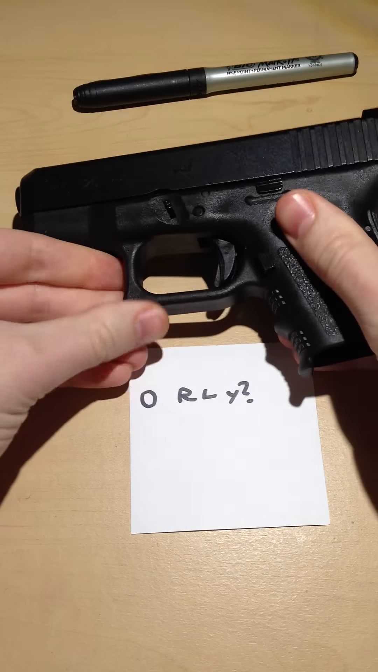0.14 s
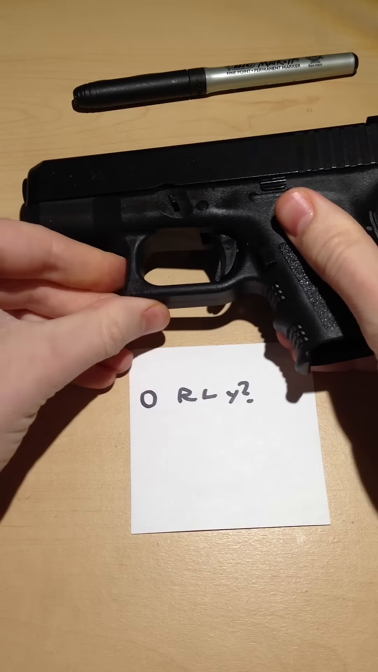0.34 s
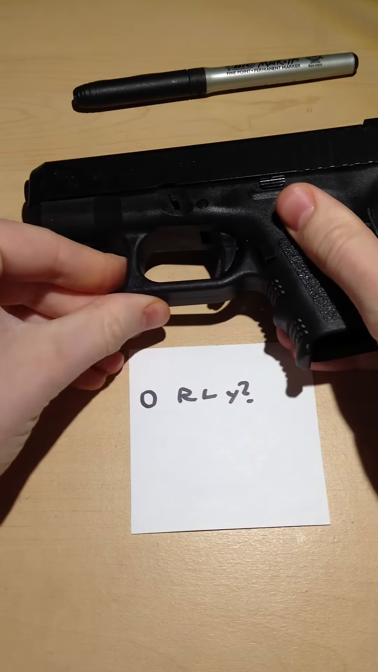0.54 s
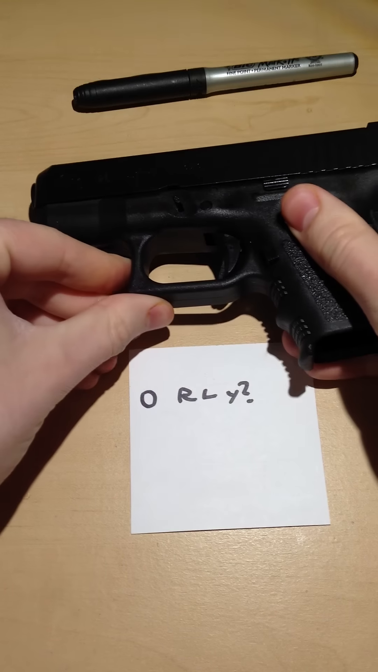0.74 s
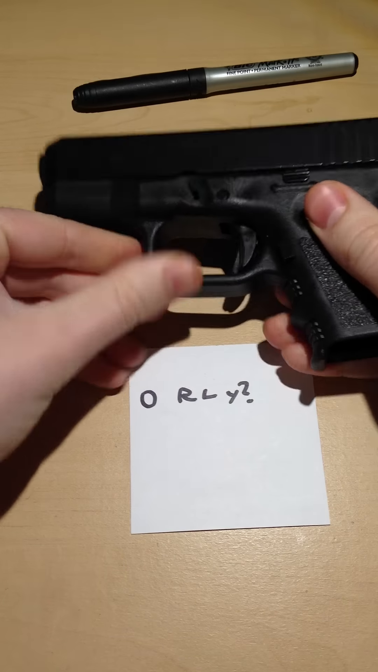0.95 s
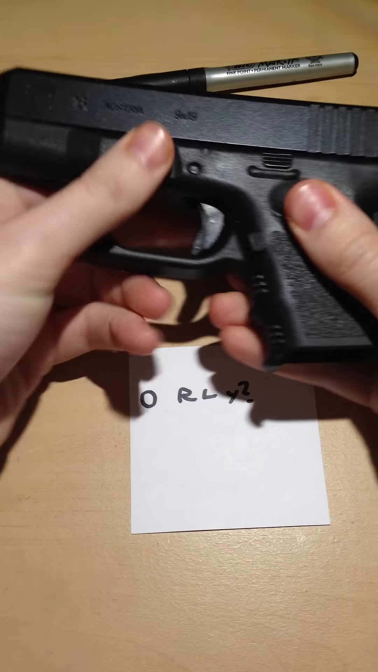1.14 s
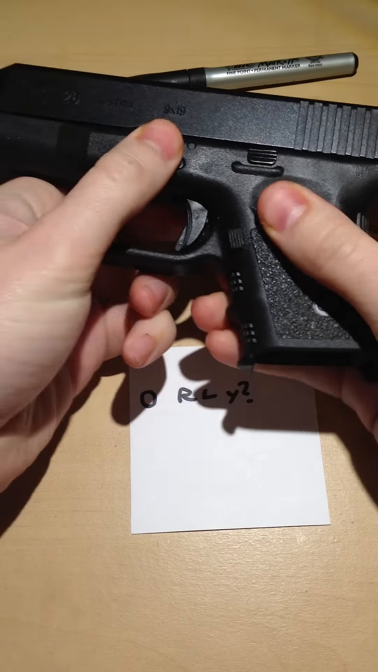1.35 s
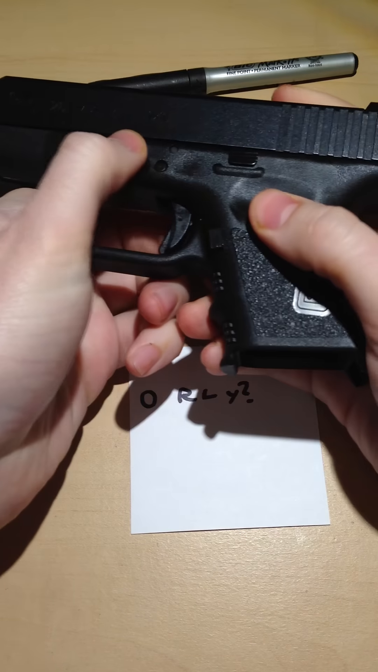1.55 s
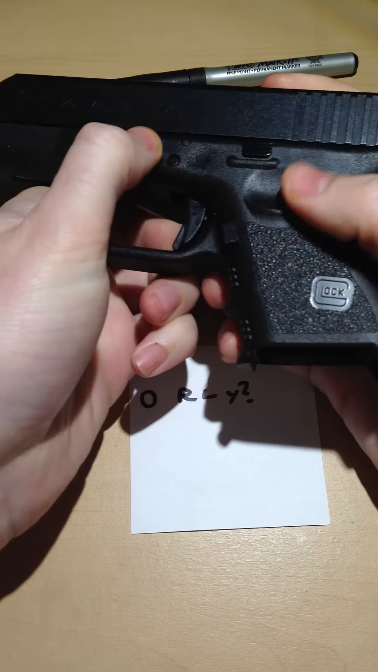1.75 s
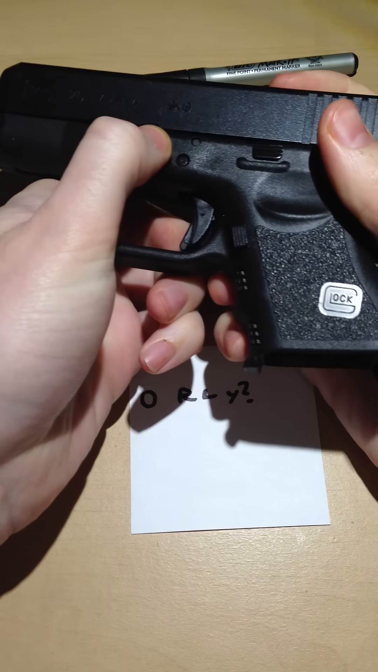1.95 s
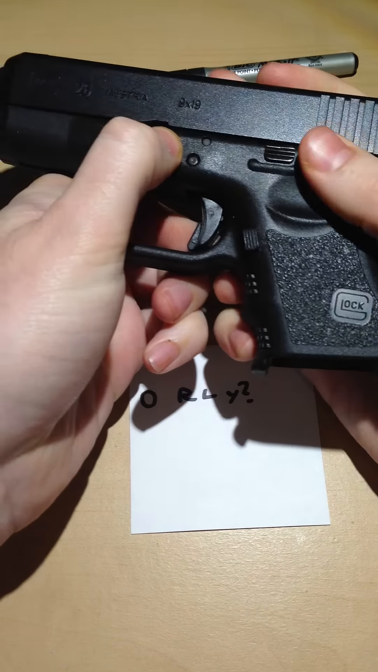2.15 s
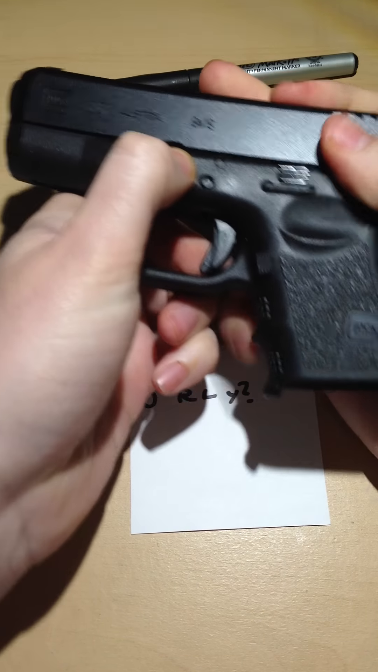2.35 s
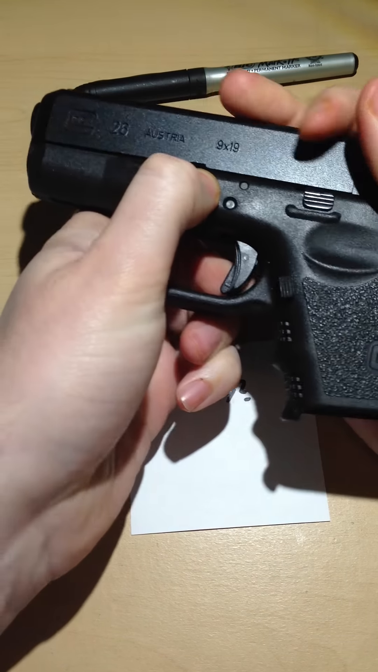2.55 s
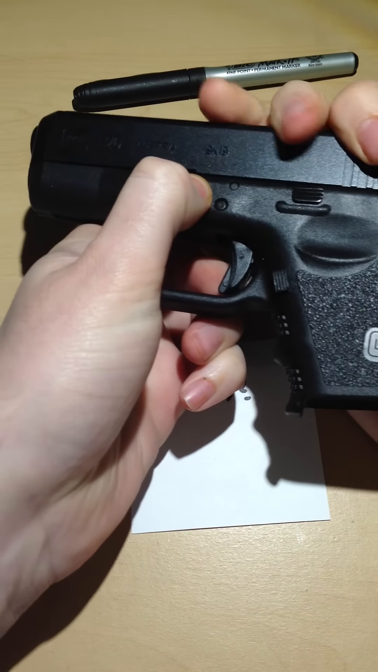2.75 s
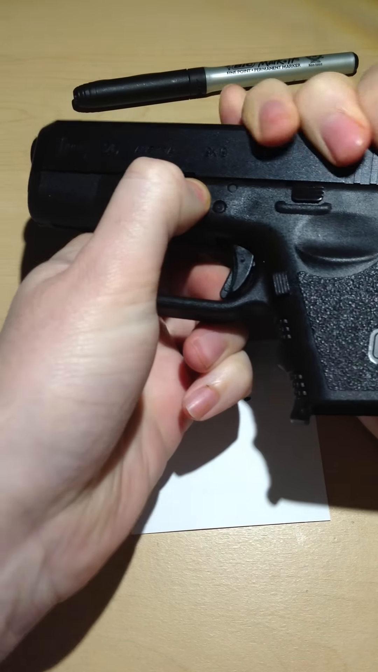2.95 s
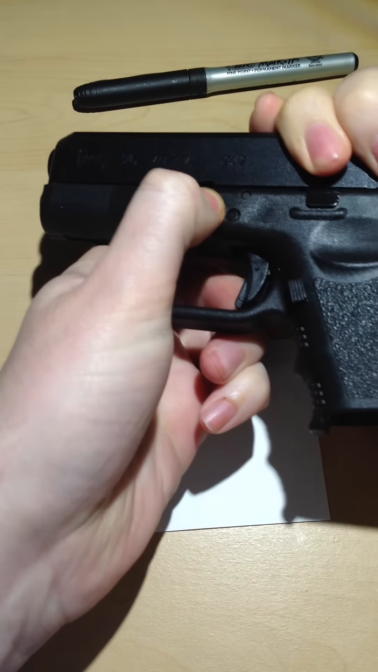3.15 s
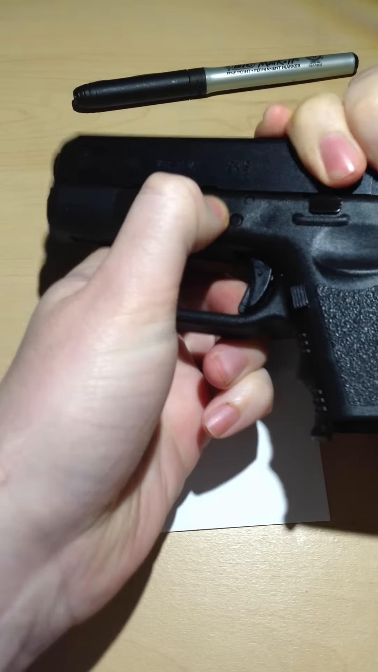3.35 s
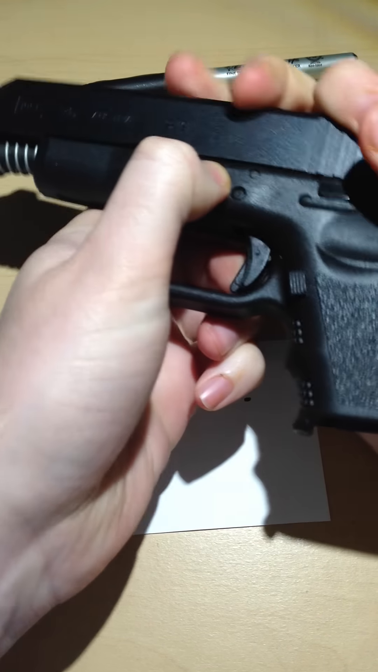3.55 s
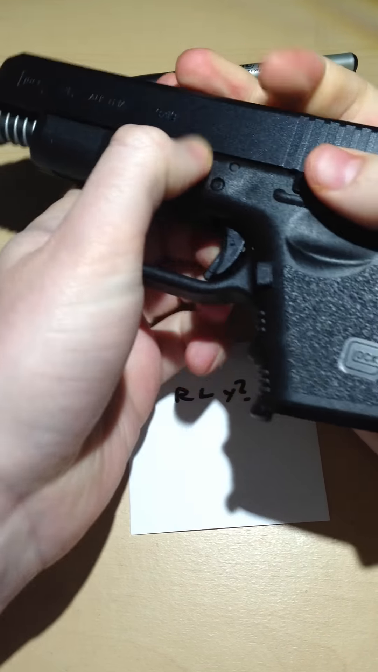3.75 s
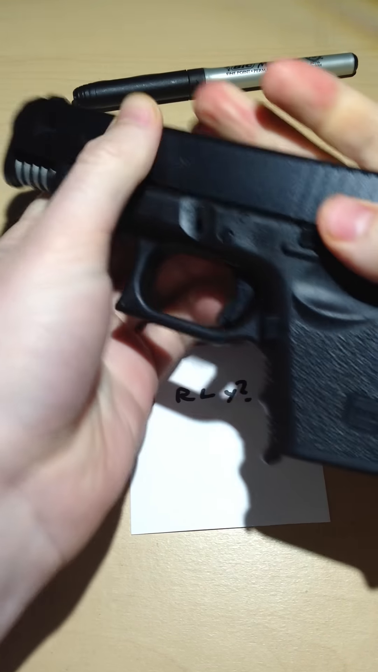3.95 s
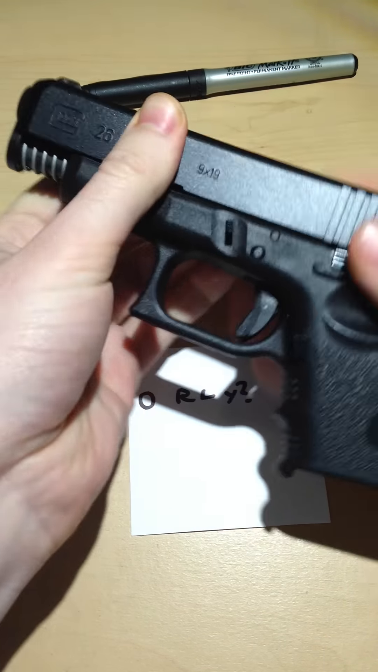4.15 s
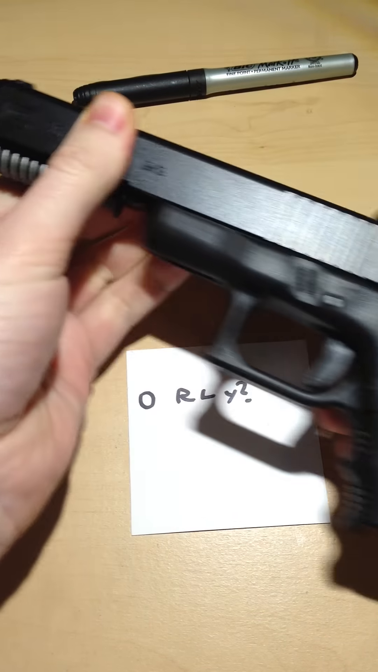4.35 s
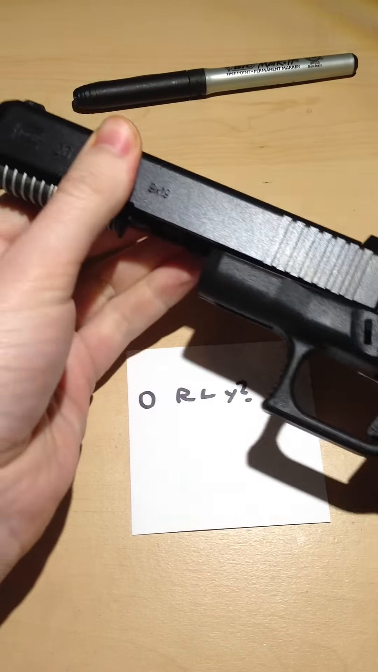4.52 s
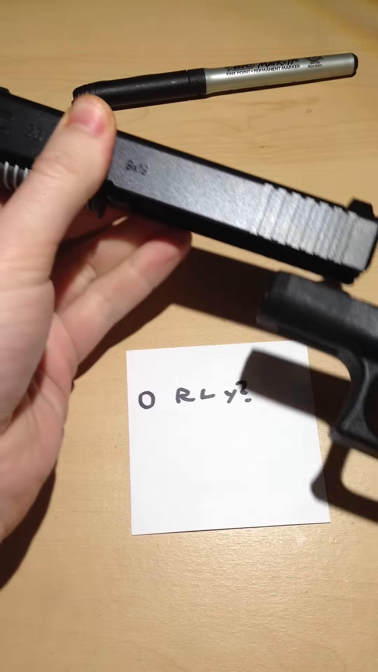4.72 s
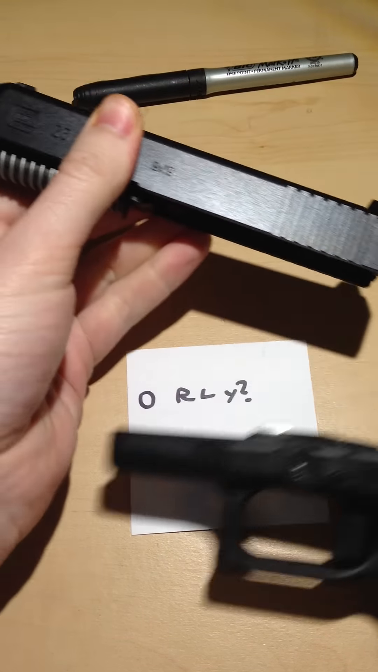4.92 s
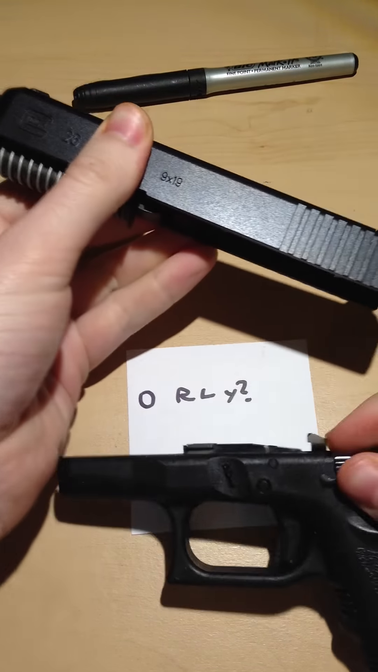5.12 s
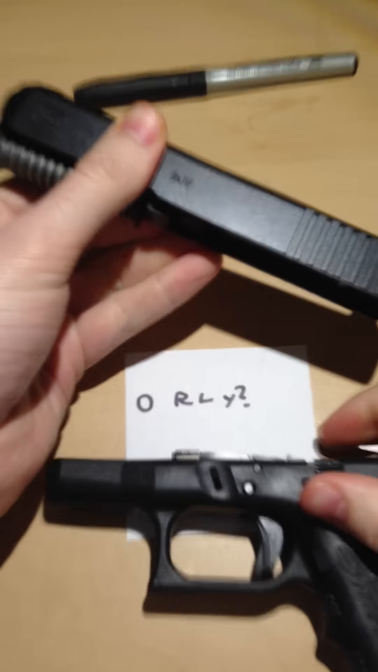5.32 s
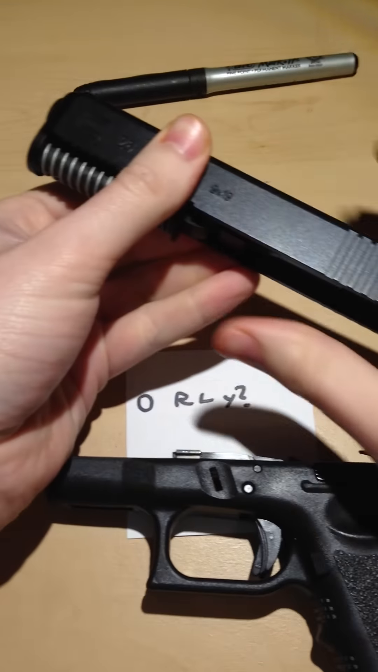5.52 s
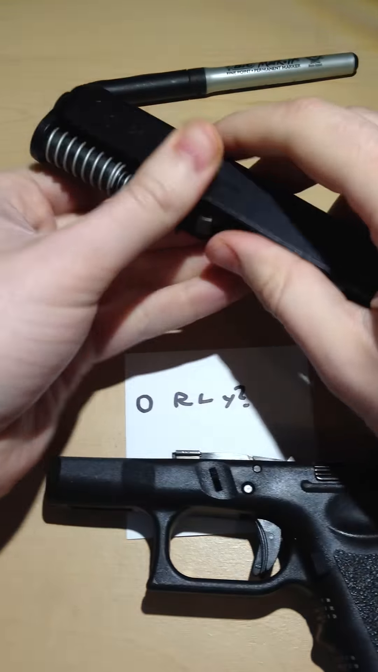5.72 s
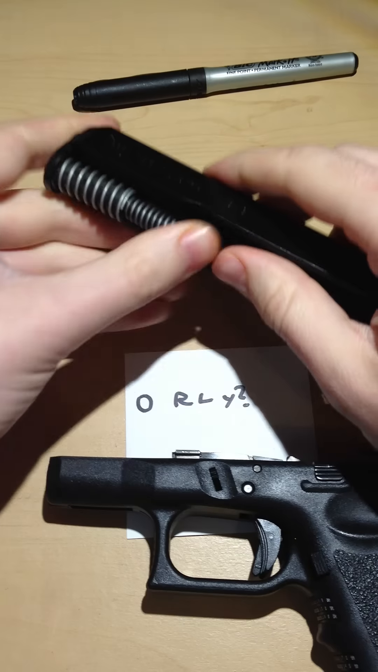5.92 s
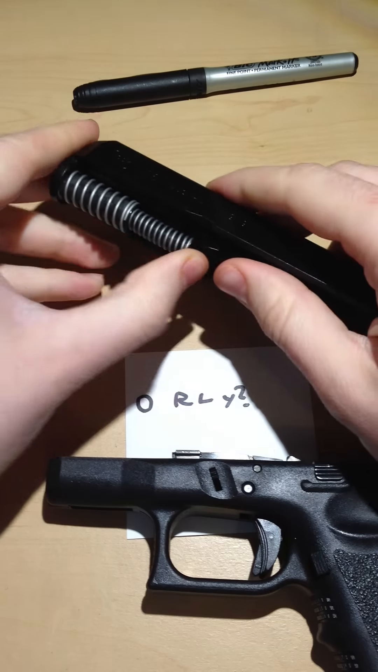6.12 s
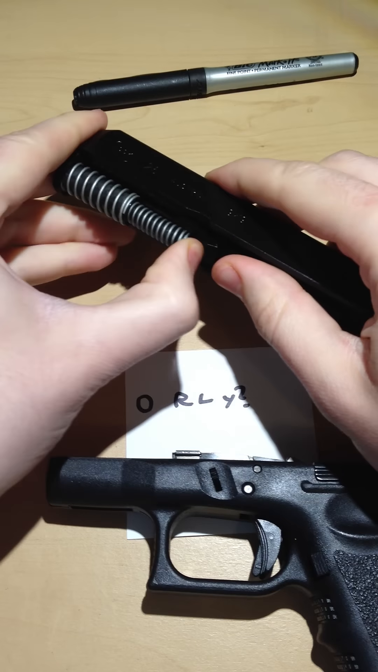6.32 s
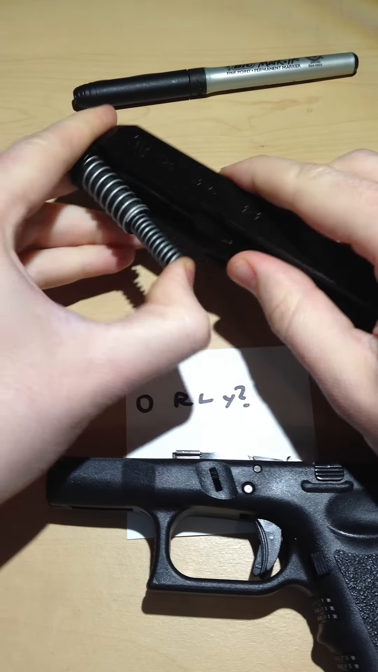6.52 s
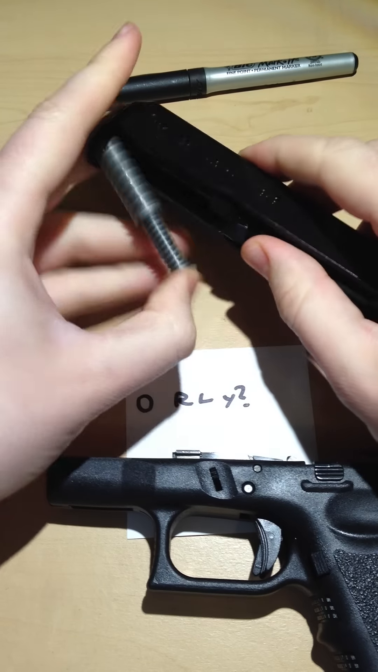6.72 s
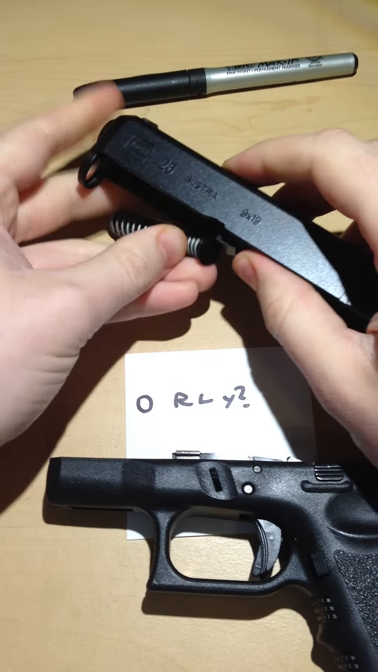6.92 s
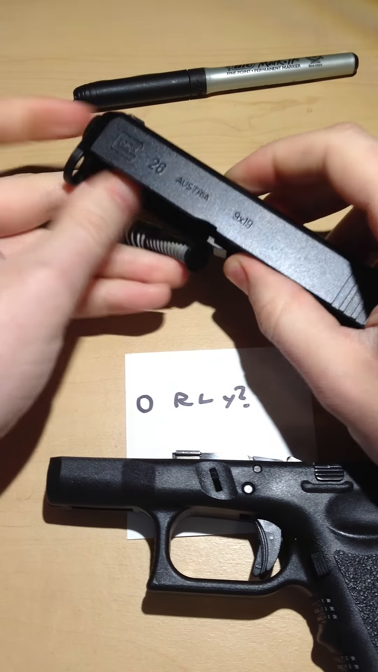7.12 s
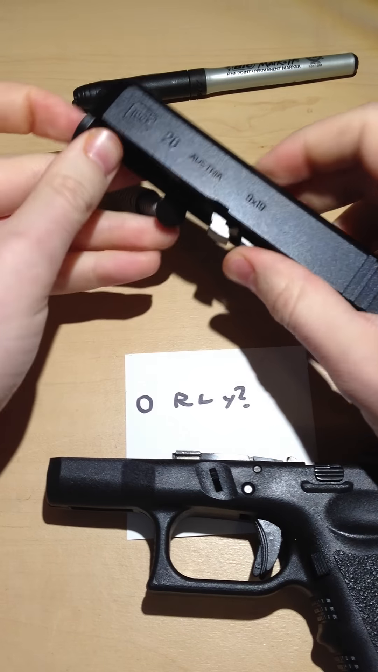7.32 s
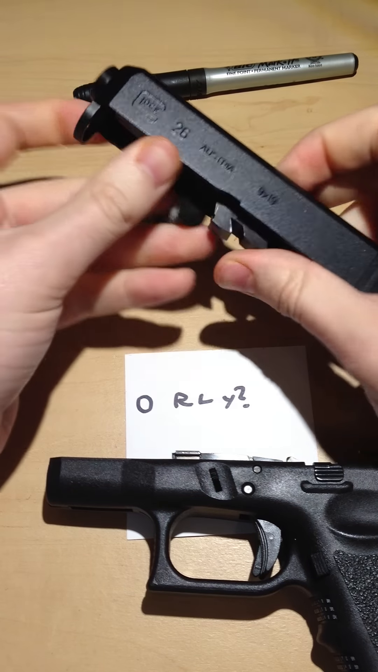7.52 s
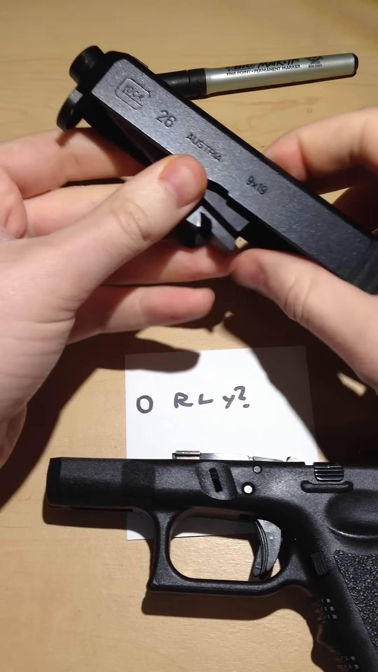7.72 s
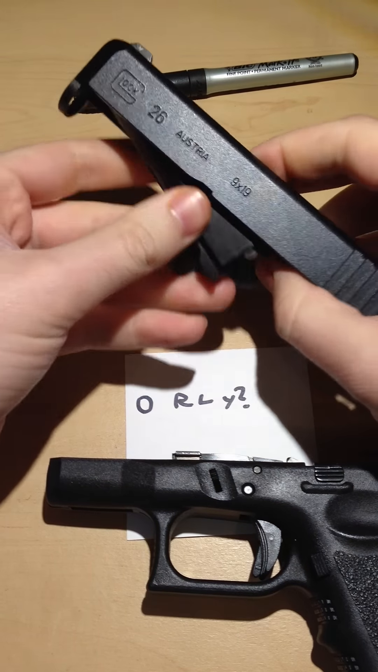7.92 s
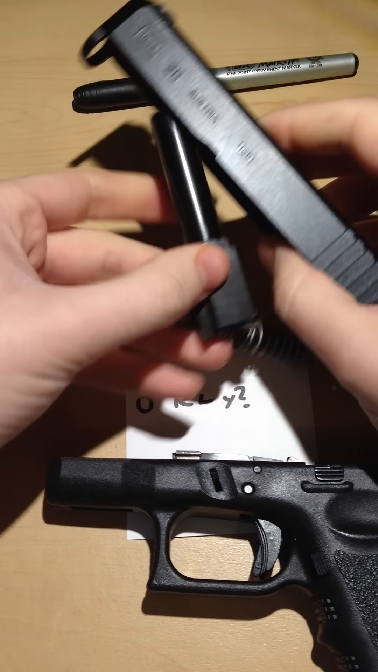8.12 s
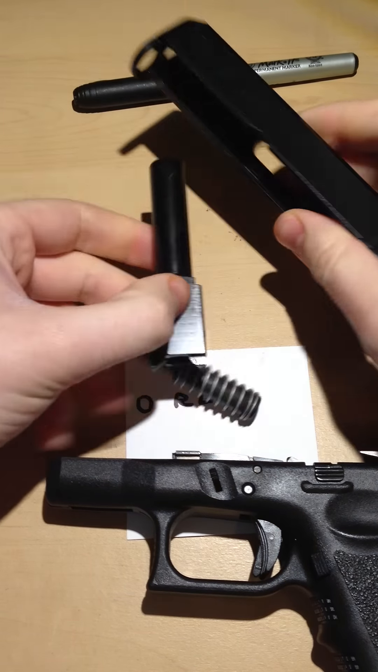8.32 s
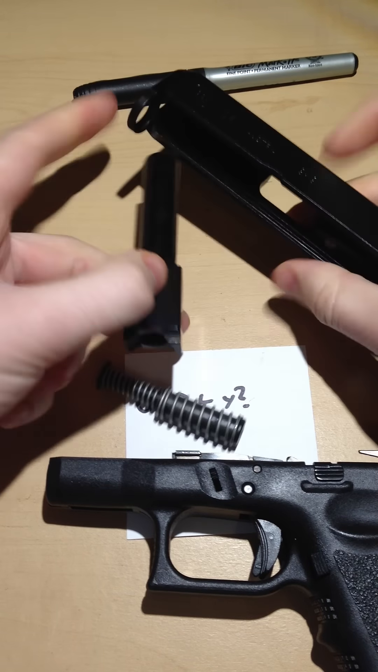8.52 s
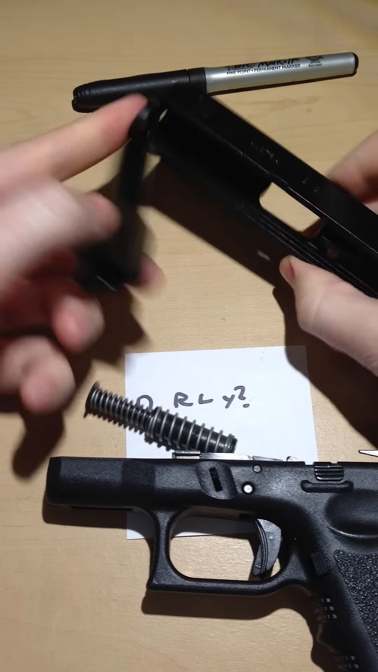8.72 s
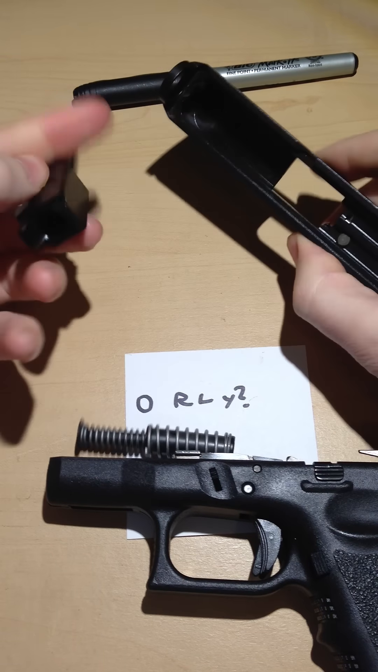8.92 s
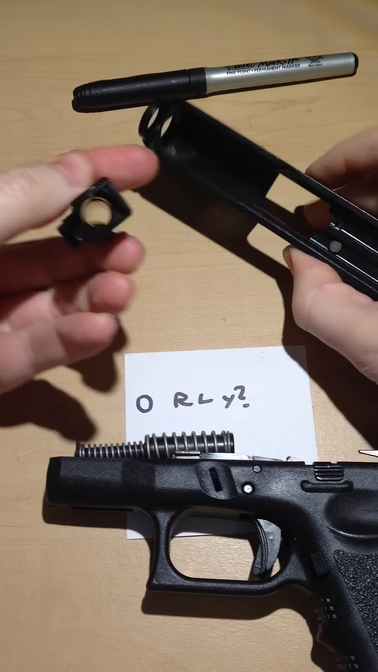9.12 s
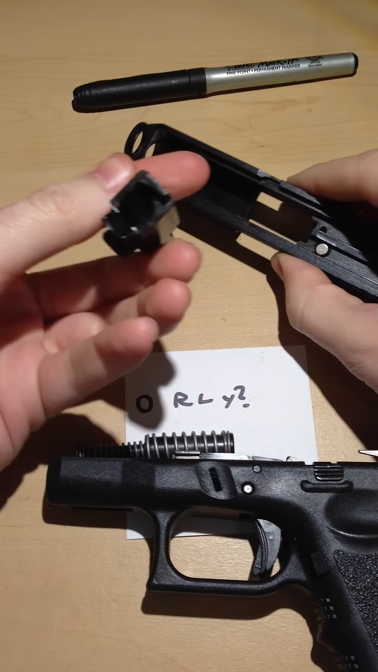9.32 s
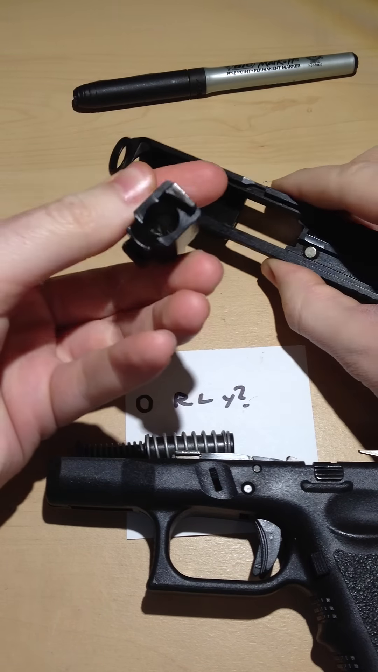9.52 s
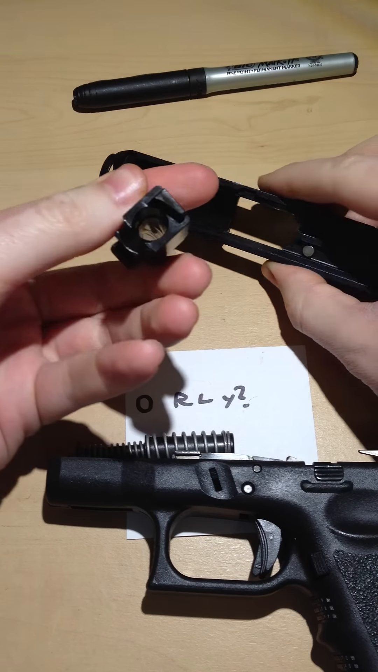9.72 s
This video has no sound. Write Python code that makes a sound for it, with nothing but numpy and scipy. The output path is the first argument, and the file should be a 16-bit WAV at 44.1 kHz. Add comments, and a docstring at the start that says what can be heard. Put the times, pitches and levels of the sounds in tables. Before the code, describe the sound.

A close microphone over a wooden desk in a small room, with soft steady air noise and faint fan tones throughout. At about 0.7 s a dull snap of the trigger with a light desk knock, then barely audible finger rubs and tiny clicks until 2.4 s, when there is a firmer click. A sharp click at 3.1 leads to a rapid cluster of bright clacks at 3.4-3.6 as the slide jumps. Scrapes and small clicks at 4.3-4.7 as it slides off its rails. At 5.2-5.4 the frame lands: the loudest, multiple clacks with woody boom. Quiet, then at 6.95 the spring pops out with a snap and chatter. From 7.3 to 8.3 thin steel clinks, gritty drags and soft rumbling handling. At 8.44 the spring drops, rattling; barrel clinks ring at 8.6-8.8, small spring ticks at 9.1, faint desk thuds near 9.5-9.7.

```python
"""A polymer-framed pistol is field-stripped by hand over a wooden desk in a small room, close to the microphone.
Over steady air noise and fan tones the trigger snaps and the slide clacks and scrapes off its rails: filtered
noise bursts and grainy strokes. The frame is laid on the desk, whose modes boom under a woody noise knock.
The recoil spring pops out and is dropped, its coils chattering as resonant noise; the steel barrel clinks in
decaying sines and drags in noisy resonances against the slide as it is lifted out."""
import sys
import numpy as np
from scipy import signal
from scipy.fft import rfft, irfft
from scipy.io import wavfile
from scipy.ndimage import uniform_filter1d, map_coordinates

SR = 44100
rng = np.random.default_rng(int(sys.argv[2]) if len(sys.argv) > 2 else 0)


def output_pcm(signal):
    """Save a mono or channel-first signal as 16-bit PCM at the path in sys.argv[1].

    Samples are clipped to [-1, 1] before scaling.
    """
    pcm = np.clip(np.atleast_2d(signal).T, -1, 1) * 32767
    wavfile.write(sys.argv[1], SR, np.round(pcm).astype(np.int16))


N = 430416
AGE = np.arange(SR // 2) / SR  # time since a blow, s

# the pistol body's noise colour: freq_hz [Hz], density_db [dB per Hz, relative]
BODY_COLOUR = [(240, -52.5), (400, -22.5), (633, -10.5), (1130, -0.5), (1710, -0.5), (2030, 1), (3210, -1),
               (4290, -2.5), (6580, -9), (7210, -8), (7790, -11.5), (10400, -12.5), (11200, -20),
               (12500, -17.5), (15500, -30.5)]
# range that the small parts radiate: low_hz, high_hz [Hz]
RADIATED_HZ = (870, 15000)


def amp(db):
    """Decibels to gain."""
    return 10 ** (np.asarray(db) / 20)


def unit(x):
    """x at rms 1."""
    return x / np.sqrt(np.mean(x ** 2) + 1e-20)


def blow(x):
    """x scaled so that its loudest 4 ms have rms 1."""
    return x / np.sqrt(uniform_filter1d(x ** 2, size=176).max() + 1e-20)


def along(points, hz):
    """(Hz, value) points read on a log frequency axis."""
    point_hz, value = np.transpose(points)
    return np.interp(np.log(hz + 1), np.log(point_hz + 1), value)


def add(track, s, x):
    """Mix x into the track from time s, in seconds."""
    part = track[round(s * SR):][:len(x)]
    part += x[:len(part)]


def band(x, edges):
    """Causal band-pass between two edges in Hz."""
    return signal.sosfilt(signal.butter(3, edges, "band", fs=SR, output="sos"), x)


def fade(t60, size=len(AGE)):
    """Free decay after a blow: 60 dB in t60 seconds."""
    return amp(-60 * AGE[:size] / t60)


def slope(hz, db_per_octave):
    """Hard contacts lift the treble and soft ones round it off: dB at each frequency."""
    pivot_hz = 3000
    soft_rolloff = 0.49  # how much faster a soft contact loses its highest octaves
    octaves = np.log2(np.maximum(hz, RADIATED_HZ[0]) / pivot_hz)
    rounding = soft_rolloff * min(db_per_octave, 0) * np.maximum(octaves, 0) ** 2
    return db_per_octave * octaves + rounding


def noise(colour, size, bright_db=0):
    """Noise of rms 1 with the given colour and brightness (dB per octave)."""
    hz = np.fft.rfftfreq(size, 1 / SR)
    spectrum = rfft(rng.standard_normal(size))
    return unit(irfft(spectrum * amp(along(colour, hz) + slope(hz, bright_db)), size))


def resonance(x, hz, width_hz):
    """x through one mode of a solid part."""
    return signal.lfilter(*signal.iirpeak(hz, hz / width_hz, fs=SR), x)


def catches(size, depth_db, per_s):
    """Uneven grip of two surfaces, as a gain gliding between per_s random points a second."""
    wander = map_coordinates(rng.standard_normal(size), [np.arange(size) * per_s / SR])
    return amp(depth_db * wander)


def room(x, gap_s=.002, early_db=-2, early_t60=.1):
    """Desk and near walls answer first; in the longer tail behind them treble dies soonest."""
    # decay of the tail: freq_hz [Hz], t60_s [s]
    tail_t60 = [(150, 0.7), (400, 0.42), (1000, 0.44), (3000, 0.39), (7000, 0.16), (14000, .14)]
    # what the walls return: freq_hz [Hz], level_db [dB]
    wall_colour = [(60, -13), (180, -0.5), (500, 3), (750, 6), (1300, -1.5), (2200, -5), (5000, -1.5),
                   (10000, -1.5), (15000, -28.5)]
    hz, _, grains = signal.stft(rng.standard_normal(len(AGE)), SR, nperseg=256)
    t = np.linspace(0, AGE[-1], grains.shape[1])
    late = amp(-60 * t / along(tail_t60, hz)[:, None])
    early = amp(early_db - 60 * t / early_t60)
    colour = amp(along(wall_colour, hz)[:, None])
    tail = signal.istft(grains * colour * (late + early), SR, nperseg=256)[1]
    tail *= 1 - np.exp(-np.arange(len(tail)) / SR / gap_s)  # the answer swells in after the direct sound
    return signal.oaconvolve(x, tail / np.linalg.norm(tail))[:N]


def room_tone(air_db=-60):
    """Steady air noise with the faint tones of a fan."""
    # air noise colour: freq_hz [Hz], density_db [dB per Hz, relative]
    air_colour = [(18, -48.5), (30, -40.5), (90, -16.5), (173, 0), (208, -1), (249, -5.5), (359, -3),
                  (389, -6.5), (479, -4), (656, -12.5), (1230, -18), (1640, -18), (2690, -21),
                  (3150, -21.5), (15500, -27.5)]
    # fan tones: pitch_hz [Hz], rms_level_db [dB]
    fan_tones = [(355.3, -75), (479.1, -72.5), (1217, -82), (2778, -82)]
    t = np.arange(N) / SR
    hum = np.zeros(N)
    for hz, db in fan_tones:
        hum += amp(db) * np.sqrt(2) * np.sin(2 * np.pi * (hz * t + rng.random()))
    return amp(air_db) * noise(air_colour, N) + hum


def clicks(wet_db=-12, width_hz=280, rise_s=0.00059, t60=.02, graze_db=-29, graze_s=.005):
    """Hand-damped parts graze, then meet: dense modes die fast, one stressed by the point of contact."""
    # damped contacts of frame, slide and spring:
    # start_s [s], level_db [dB], brightness [dB per octave], main_resonance_hz [Hz], its_strength_db [dB]
    contacts = [(.188, -52, -1.5, 2730, 1), (.7272, -30.5, -6, 1200, 2), (.8595, -37, -6, 1850, 17),
                (1.573, -50, 0.5, 1670, 7), (1.663, -44, 6.5, 1750, 8), (2.286, -46.5, -4.5, 1360, 13),
                (2.416, -40.5, -2.5, 2140, 13), (2.4415, -27.5, 0.5, 2030, -4),
                (2.4977, -36.5, -1, 1630, 29), (3.001, -52, -2, 1400, 7), (3.109, -44.5, -3, 2430, 18),
                (3.139, -22.5, 2.5, 2080, 5), (3.4445, -24.5, -1, 1450, 8), (3.455, -30.5, -1, 2200, 4),
                (3.486, -39.5, 1, 2390, 18), (3.528, -20, 3.5, 2830, 2.5), (3.5504, -20, 1, 2950, 7),
                (3.56, -25.5, -1.5, 1970, 3), (3.5696, -26, 4, 2040, 10.5), (3.871, -50, 1.5, 2030, 10),
                (3.976, -45, -4.5, 1500, 9.5), (4.062, -36, -2.5, 1330, 3), (4.14, -45.5, -0.5, 1780, 9),
                (4.2704, -28, -1.5, 1160, 4), (4.3104, -38.5, 4, 1800, 11), (4.3315, -30.5, -1.5, 1750, -8),
                (4.3474, -35, 1.5, 2470, 5), (4.4355, -34, 1.5, 1940, 7.5), (4.69, -32, -2, 2000, 4),
                (4.7277, -37.5, 1, 2620, 6.5), (5.214, -17, -3.5, 2740, 7.5), (5.236, -16.5, -5, 3957, 6.5),
                (5.242, -10.5, -2.5, 2130, 9.5), (5.269, -15.5, -3, 1820, 6), (5.385, -20, -5, 4140, 14),
                (5.398, -22.5, -2, 1200, 1), (5.4144, -25.5, -2, 1060, 7), (6.444, -27.5, 6.5, 1440, 6),
                (6.5625, -52, 4.5, 2810, 10.5), (6.8569, -38, 9, 9870, 14), (6.9535, -15, -3, 1250, 10),
                (6.9575, -17.5, 4, 1890, 19), (7.031, -39, 9.5, 2000, 9), (7.2837, -29, 7, 4800, 8),
                (7.63, -33, 4, 3130, 11.5), (8.439, -15.5, -0.5, 2850, 12.5), (8.4717, -21, -3.5, 2870, 10),
                (9.0723, -44, -1, 1990, 6)]
    out = np.zeros(N)
    impact = fade(t60, size=4096)
    impact = impact * (1 - np.exp(-AGE[:len(impact)] / rise_s))
    graze = np.linspace(0, 1, round(graze_s * SR))
    envelope = np.concatenate([amp(graze_db) * graze, impact])
    for s, db, bright_db, ring_hz, ring_db in contacts:
        burst = noise(BODY_COLOUR, len(envelope), bright_db) * envelope
        stressed = amp(ring_db) * resonance(burst, ring_hz, width_hz)
        add(out, s - len(graze) / SR, amp(db) * blow(band(burst + stressed, RADIATED_HZ)))
    return out + amp(wet_db) * room(out)


def knocks(modes_db=-2, knock_db=-3, push_db=-29, push_growth=.35, full_db=-22, wet_db=-14):
    """The desk top booms under a woody knock: deep blows favour low modes, hard ones the knock, heavy ones push."""
    # blows that reach the desk: start_s [s], base_level_db [dB], hardness_db [dB], depth_db [dB]
    desk_blows = [(0.7287, -23, -1.5, -3.5), (.74, -43.5, 14, 9), (.773, -49, 12, 3),
                  (2.444, -46, -21, -9.5), (3.53, -54, 14, -3), (3.548, -51, 0, 5), (5.213, -22, 3.5, 0.5),
                  (5.247, -17, -3, 1.5), (5.272, -18, -8, 2), (5.386, -17.5, -10, 4.5),
                  (5.397, -20.5, 5.5, 1), (5.414, -19.5, -14, -3.5), (6.954, -27.5, 4, -7),
                  (8.439, -41.5, 10.5, 16.5), (8.471, -46, 2.5, 15), (9.496, -39.5, -6, -8.5),
                  (9.535, -40.5, -16.5, -12), (9.677, -40, -21, -6), (9.709, -40.5, -23, -4)]
    # deep boom, then higher thud, each a list of modes: centre_hz [Hz], relative_level_db [dB], t60_s [s]
    desk_modes = [
        [(122, -22, 0.058), (186.3, -8, 0.17), (198, -8, 0.037)],
        [(267, 2.5, 0.052), (318, -2.5, 0.12), (352, 3.5, 0.098), (514, -4, 0.09)],
    ]
    # the desk's knock: freq_hz [Hz], density_db [dB per Hz, relative]
    wood_colour = [(200, -32), (420, -3), (560, -1), (700, -7.5), (900, -10.5), (1300, -22), (2200, -37.5),
                   (5000, -75.5)]
    out = np.zeros(N)
    for s, db, hard_db, deep_db in desk_blows:
        boom_db, thud_db = db + deep_db / 2, db - deep_db / 2
        for level_db, modes in zip((boom_db, thud_db), desk_modes):
            ring = np.zeros(len(AGE))
            for hz, mode_db, t60 in modes:
                struck_hz = hz * rng.normal(1, 0.011)  # every blow detunes the modes slightly
                ring += amp(mode_db) * fade(t60) * np.sin(2 * np.pi * (struck_hz * AGE + rng.random()))
            # the top radiates little below its first strong mode
            add(out, s, amp(level_db + modes_db) * blow(band(ring, (130, 900))))
        wood = band(noise(wood_colour, len(AGE)) * fade(.065), (250, 5000))
        add(out, s, amp(db + hard_db + knock_db) * blow(wood))
        push = band(rng.standard_normal(len(AGE)) * fade(0.069), (25, 110))
        weight_db = push_growth * (db - full_db)
        add(out, s, amp(boom_db + push_db + weight_db) * blow(push))
    return out + amp(wet_db) * room(out)


def scrapes(swell=0.24, wet_db=-13, ring_db=6, width_hz=170, shift_db=4):
    """Sliding surfaces catch and slip in tiny grains; as the contact travels, the body's modes come and go."""
    # sliding strokes of steel and fingers:
    # start_s [s], end_s [s], level_db [dB], brightness [dB per octave], main_resonance_hz [Hz]
    strokes = [(0.927, 0.995, -59.5, 2, 4700), (1.087, 1.19, -64.5, -4.5, 3260),
               (1.198, 1.38, -58, -7, 1720), (1.457, 1.49, -40.5, 2.5, 1610),
               (1.642, 1.673, -43.5, -1.5, 1520), (1.688, 1.81, -63.5, 2, 1630),
               (2.405, 2.483, -46.5, 5, 2070), (2.478, 2.497, -44, -2.5, 1620),
               (3.243, 3.255, -51, 4.5, 3000), (3.541, 3.599, -30.5, 1, 2080),
               (3.958, 4.31, -60.5, 5, 2040), (4.27, 4.38, -41, -2.5, 1800), (4.346, 4.476, -38, -1, 2400),
               (4.441, 4.497, -40.5, 0.5, 1300), (4.672, 4.737, -43, 0, 2900), (5.039, 5.1, -59, 0.5, 2800),
               (5.149, 5.242, -53, 0, 2040), (6.818, 6.864, -59.5, 3.5, 3000), (6.997, 7.128, -57, 1, 9600),
               (7.209, 7.37, -56, 0.5, 9700), (7.543, 8.2, -55, -1.5, 1150)]
    # neighbouring modes the contact passes over: ratio_to_main_resonance [ratio], level_db [dB]
    neighbours = [(.56, -8), (1, 3), (1.45, -6)]
    out = np.zeros(N)
    for start, end, db, bright_db, ring_hz in strokes:
        size = round((end - start) * SR)
        grip = catches(size, depth_db=4.5, per_s=1100) * catches(size, depth_db=2.3, per_s=160)
        slips = noise(BODY_COLOUR, size, bright_db) * grip
        modes = np.zeros(size)
        for ratio, mode_db in neighbours:
            shift = catches(size, depth_db=shift_db, per_s=49)
            modes += amp(mode_db) * shift * resonance(slips, ratio * ring_hz, width_hz)
        stroke = unit(band(slips + amp(ring_db) * modes, RADIATED_HZ))
        add(out, start, amp(db) * stroke * np.hanning(size) ** swell)
    return out + amp(wet_db) * room(out)


def spring(wet_db=-13):
    """The jolted coils chatter until they settle; later the loose spring rolls into the frame with short
    rattles."""
    # chatter of the loose recoil spring:
    # start_s [s], level_db [dB, before the decay], t60_s [s], centre_hz [Hz], width_hz [Hz]
    rattles = [(6.96, -34, 0.41, 1390, 2360), (8.446, -33.5, 0.43, 2790, 2200),
               (9.0725, -31, 0.026, 2210, 398), (9.0898, -25, 0.024, 2220, 448)]
    out = np.zeros(N)
    for s, db, t60, hz, width_hz in rattles:
        chatter = rng.standard_normal(len(AGE)) * catches(len(AGE), depth_db=2.5, per_s=400)
        coils = resonance(band(chatter, (hz / 2, hz * 2)), hz, width_hz)
        add(out, s, amp(db) * unit(coils) * fade(t60))
    return out + amp(wet_db) * room(out)


def clinks(ring_db=1, low_db=-19, tick_db=-14, slide_db=-19, seat_share=0.44, tick_t60=0.0063, wet_db=-17,
           attack_s=0.00021, slide_t60=.13, waver_db=3, linger_db=-25, linger_t60=0.51):
    """Each touch rings the barrel; in the slide its upper modes are muted, and the grip shortens the ring."""
    # barrel against slide: start_s [s], strength_db [dB], muting_by_seat_db [dB],
    # mode_4400_hz_db [dB], modes_9400_hz_db [dB], t60_s [s]
    touches = [(7.284, -24.5, 14, -24, -10, 0.085), (7.533, -10.5, 47, -20, 11, 0.034),
               (7.774, -19.5, 41.5, -4, 11, .08), (7.9737, -12, 17, -18, -1.5, 0.052),
               (8.0514, -12.5, -1, -25.5, -3, 0.058), (8.157, -38.5, 1.5, -2.5, -18, 0.19),
               (8.2303, -13, 10, 0, -4, .15), (8.6048, -6.5, 5, -18, -18.5, 0.13),
               (8.6392, -13, 3.5, -28.5, -21.5, 0.13), (8.7128, -13, -0.5, -29, -33, 0.15),
               (8.7815, -22, 6, -15, -27, 0.12)]
    # barrel modes in four families: pitch_hz [Hz], relative_level_db [dB]
    barrel_modes = [
        [(1806, -11), (2866, 0)],
        [(4407, 3)],
        [(4784, -1.5), (4910, -19), (9151, -30), (11990, -42.5)],
        [(9433, 0), (9520, -16), (9980, -31)],
    ]
    # the slide's dense modes: freq_hz [Hz], density_db [dB per Hz, relative]
    slide_colour = [(1200, -28.5), (2300, -12.5), (2950, 0), (3400, 0), (3850, 4), (4200, -9.5),
                    (4900, -2.5), (5500, -8.5), (6300, -31), (9000, -27), (9800, -9), (10500, -31),
                    (12000, -18.5), (14000, -38)]
    out = np.zeros(N)
    for s, db, muted_db, side_db, top_db, t60 in touches:
        main_db = db - muted_db
        seat_db = seat_share * muted_db
        # a free barrel rings on faintly
        decay = fade(t60) + amp(linger_db - seat_db) * fade(linger_t60)
        family_db = (db + low_db, main_db + side_db, main_db, main_db + top_db)
        for level_db, modes in zip(family_db, barrel_modes):
            ring = np.zeros(len(AGE))
            for hz, mode_db in modes:
                ring += amp(mode_db) * np.sin(2 * np.pi * (hz * AGE + rng.random()))
            grip = catches(len(AGE), depth_db=waver_db, per_s=120) * (1 - np.exp(-AGE / attack_s))
            add(out, s, amp(level_db + ring_db) * ring * grip * decay)
        tick = blow(band(noise(BODY_COLOUR, len(AGE)) * fade(tick_t60), (3000, 13500)))
        add(out, s, amp(db - seat_db + tick_db) * tick)
        chord = noise(slide_colour, len(AGE)) * fade(slide_t60)  # the slide answers with a rough chord
        add(out, s, amp(main_db + slide_db) * chord)
    return out + amp(wet_db) * room(out)


def handling(gain_db=-2):
    """Dull rumble of fingers shifting on the slide: low noise under a drawn level curve."""
    # the slide turning in the hands: time_s [s], rumble_db [dB, before gain_db]
    rumble_curve = [(7.3, -51.5), (7.536, -65.5), (7.57, -46.5), (7.906, -54.5), (7.93, -41.5),
                    (7.958, -49), (8.168, -57), (8.18, -46), (8.38, -81)]
    s, db = np.transpose(rumble_curve)
    level = amp(np.interp(np.arange(N) / SR, s, db, left=-120, right=-120) + gain_db)
    return level * unit(band(rng.standard_normal(N), (170, 600)))


def drags(swell=0.21, wet_db=-14):
    """Steel dragged on steel sings roughly in the barrel's damped modes."""
    # the barrel drags in its seat: start_s [s], end_s [s], level_db [dB], brightness [dB per octave]
    barrel_drags = [(7.521, 7.552, -50.5, -5), (7.739, 7.808, -49.5, 5.5), (7.951, 8.038, -35.5, 0),
                    (8.153, 8.258, -41, 6.5)]
    # barrel resonances, broadened while pressed on the slide:
    # centre_hz [Hz], width_hz [Hz, half that of each of two filters in series], level_db [dB]
    pressed_modes = [(1830, 81, -1), (2960, 70, 5.5), (5080, 470, 6.5), (9280, 460, -7.5),
                     (11600, 270, -18)]
    out = np.zeros(N)
    for start, end, level_db, bright_db in barrel_drags:
        size = round((end - start) * SR)
        slips = rng.standard_normal(size) * catches(size, depth_db=4.0, per_s=220)
        song = np.zeros(size)
        for hz, width, db in pressed_modes:
            mode = resonance(resonance(slips, hz, 2 * width), hz, 2 * width)
            song += amp(db + slope(hz, bright_db)) * unit(mode)
        add(out, start, amp(level_db) * unit(song) * np.hanning(size) ** swell)
    return out + amp(wet_db) * room(out)


def scene():
    """All sounds at one microphone."""
    pistol = clicks() + scrapes() + spring() + clinks() + drags()
    return (room_tone() + pistol + knocks() + handling())[None]


def record(dry):
    """The recorder keeps nothing above its band limit."""
    top_hz = 15500
    kept = np.fft.rfftfreq(N, 1 / SR) < top_hz
    return irfft(rfft(dry) * kept, N)


dry = scene()
out = record(dry)
output_pcm(out)
```